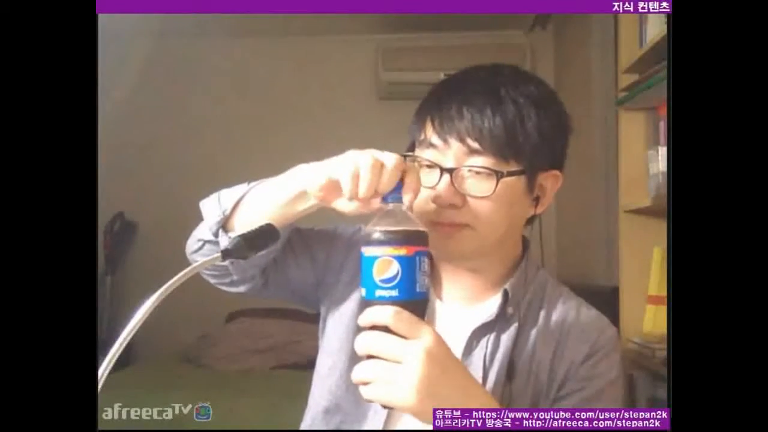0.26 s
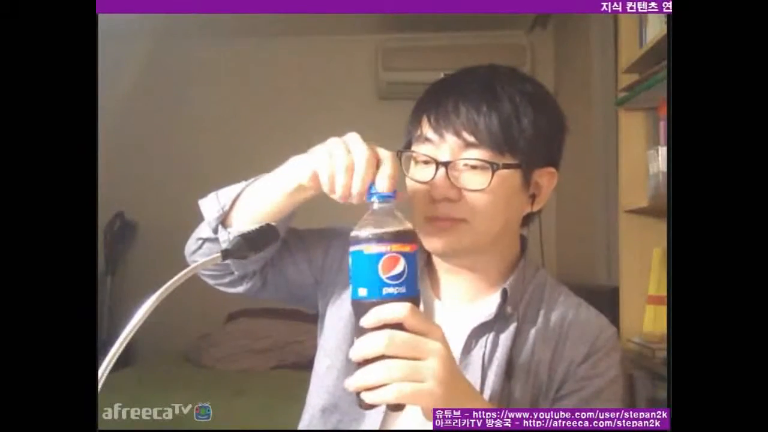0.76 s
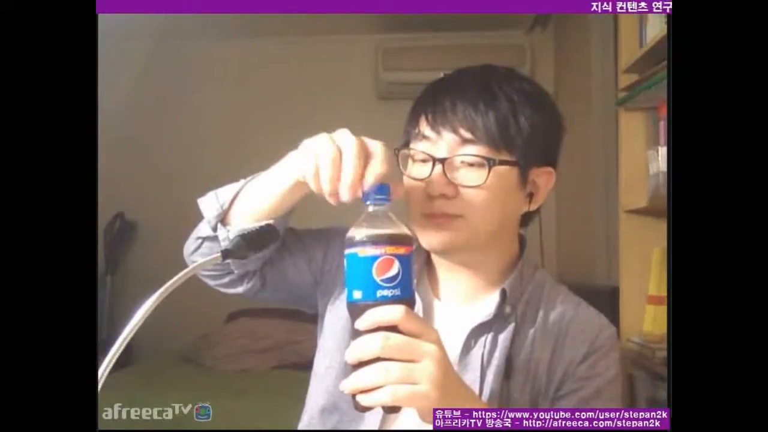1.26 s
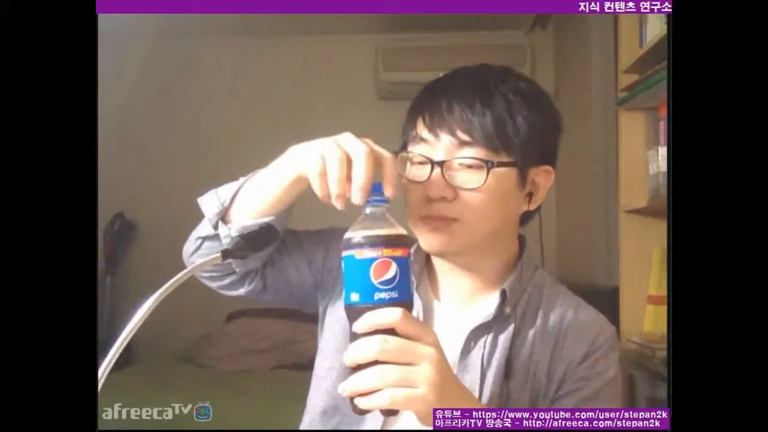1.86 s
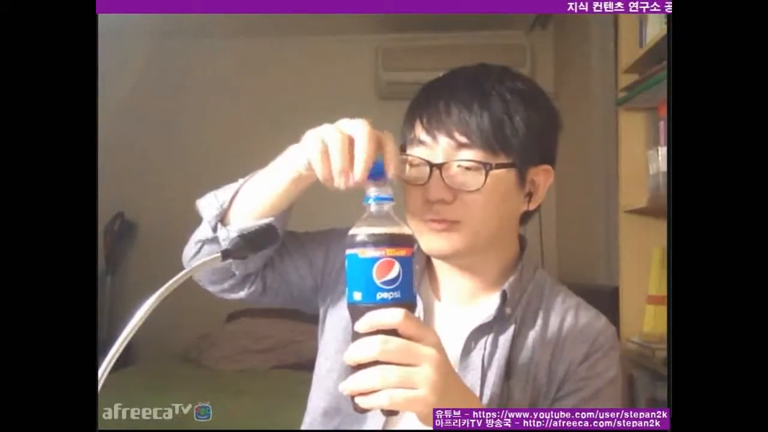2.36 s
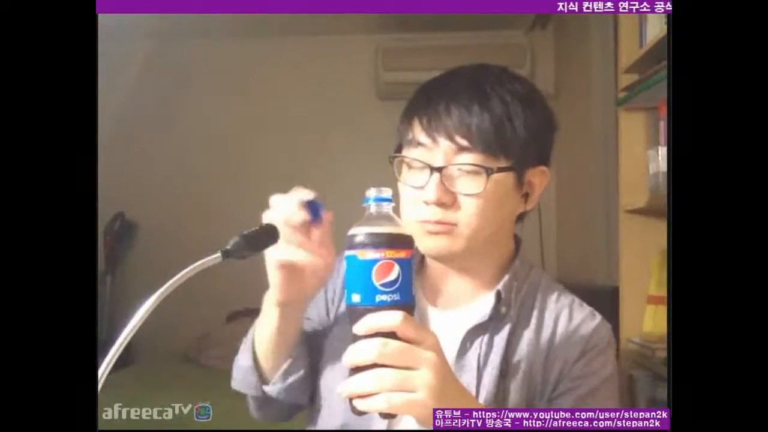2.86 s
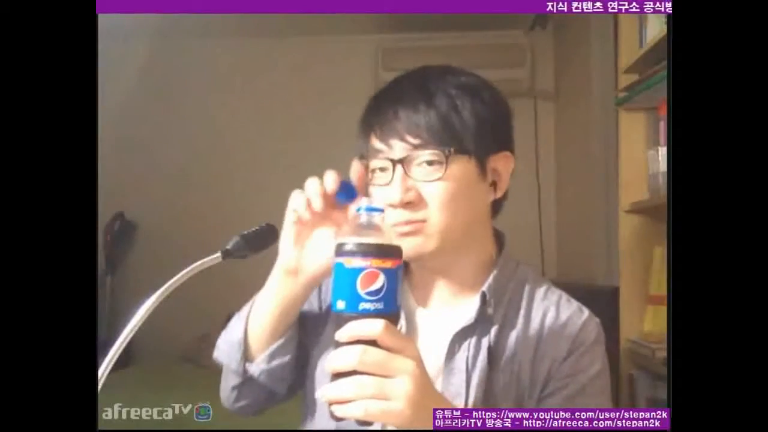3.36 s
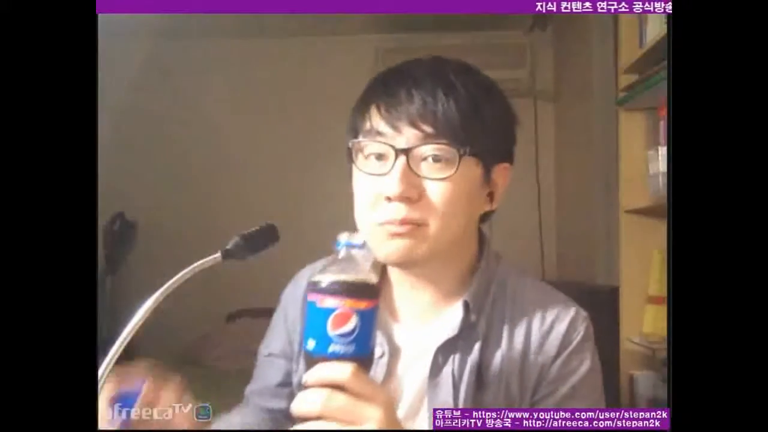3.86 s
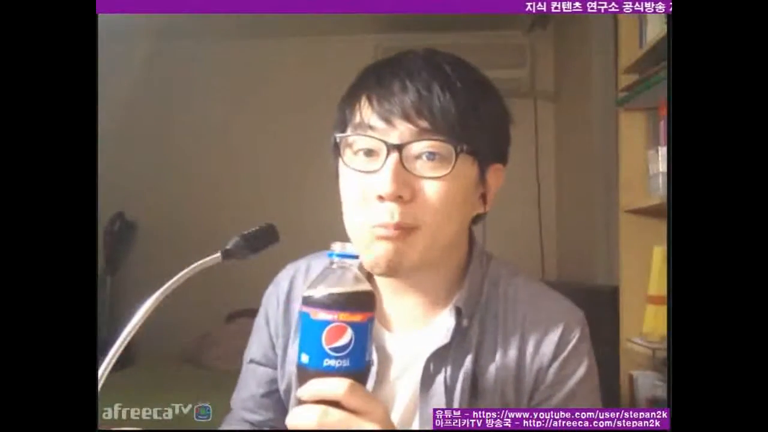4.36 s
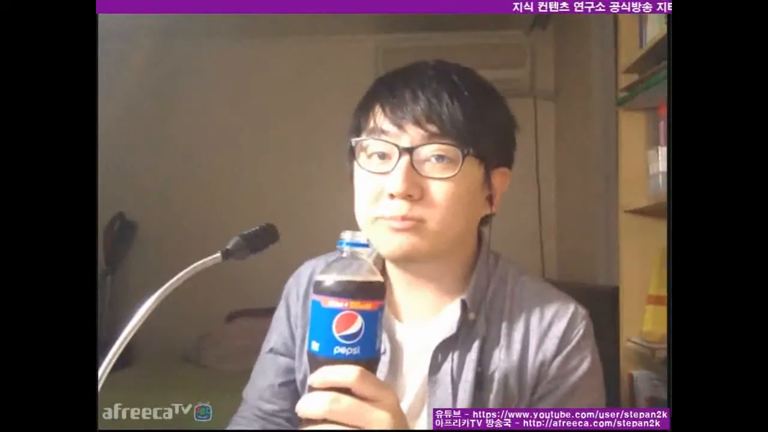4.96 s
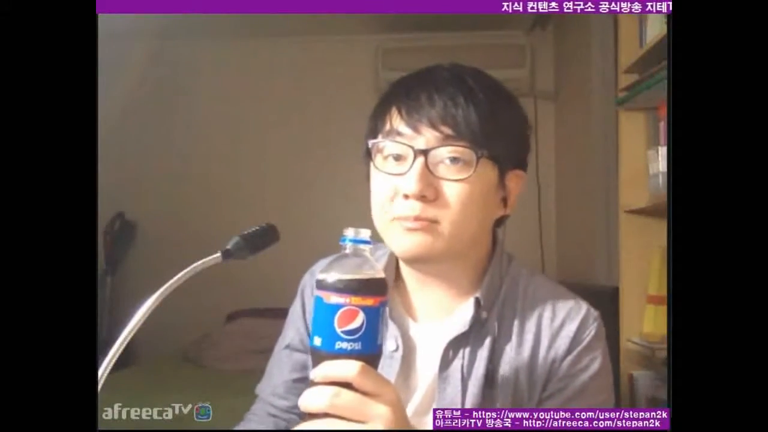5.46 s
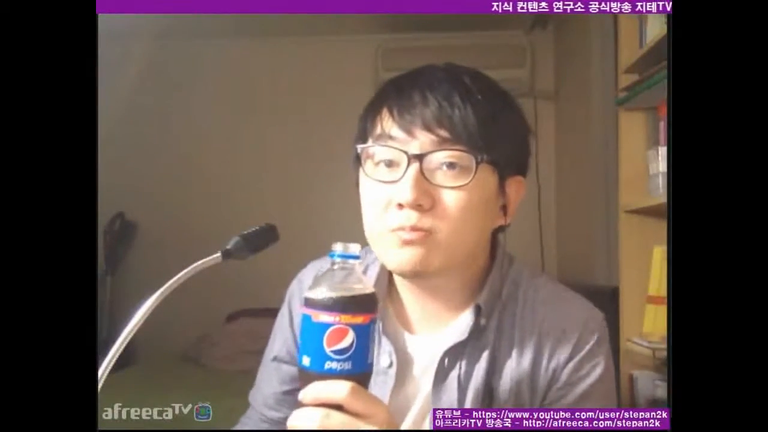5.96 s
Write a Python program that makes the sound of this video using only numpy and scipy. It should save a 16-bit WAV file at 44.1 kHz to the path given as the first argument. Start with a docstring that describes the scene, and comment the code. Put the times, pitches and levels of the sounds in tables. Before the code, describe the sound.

Close to a desk microphone in a small room, a soda bottle cap jerks on its seal with a loud sharp crack and a very brief gas hiss. The safety ring snaps, thread clicks run in quick clusters with faint rasping, and the cap pops free. A tiny rattle of the loose cap follows, then soft hollow bottle ticks and barely audible liquid laps over low hum and hiss.

```python
"""Small room, desk microphone: the screw cap of a plastic soda bottle is twisted open.
The cap jerks on its seal as gas spits, the safety ring tears, the thread clicks and rasps, the cap comes free.
The loose cap chatters, the bottle wall ticks and the drink laps softly, over mains hum and hiss.
Clicks are decaying sines plus filtered noise; gas, rasp and hiss are filtered noise; laps are rising sines.
An overload control and a steep low-pass near 7 kHz finish the sound."""
import sys
import numpy as np
from scipy import signal
from scipy.fft import rfft, irfft, next_fast_len
from scipy.io import wavfile
from scipy.ndimage import uniform_filter1d

SR = 44100
rng = np.random.default_rng(int(sys.argv[2]) if len(sys.argv) > 2 else 0)


def store_pcm(level_fs):
    """Save levels as 16-bit WAV."""
    pcm = np.round(np.clip(level_fs, -1, 1) * 32767).astype(np.int16)
    wavfile.write(sys.argv[1], SR, np.atleast_2d(pcm).T)


N = 274743
TIME_S = np.arange(N) / SR

# Source levels are ahead of room and gain control; crack levels are ahead of the shell and wall colour.
# mains lines: frequency [Hz], level_db [dB rms]
HUM_LINES = [(60, -64.5), (120, -88.5), (180, -92), (300, -83.5), (420, -92.5), (660, -92.5), (900, -96),
             (1020, -93.5)]
# microphone hiss colour: frequency [Hz], density_db [dB per Hz, relative]
HISS_COLOUR = [(30, -10), (100, 1.5), (200, 1), (450, 0), (1100, 0), (1800, -1.5), (3400, 1.5),
               (4500, -2.5), (6300, -7), (7300, -9.5)]
# room decay: frequency [Hz], t60_s [s]
ROOM_T60 = [(200, 0.3), (1000, 0.081), (3200, .33), (7000, 0.2)]
# cap and neck colour: frequency [Hz], gain_db [dB]
SHELL_COLOUR = [(60, -35.5), (150, -16.5), (330, -0.5), (900, -2), (1500, -1.5), (2100, 4), (2700, 5.5),
                (3900, 5), (5200, 1.5), (6600, -8.5), (7400, -18.5)]
# bottle wall modes: centre_hz [Hz], half_width_hz [Hz], lift_db [dB]
WALL_MODES = [(440, 110, 3.5), (860, 70, 4.5), (1205, 30, 6), (1530, 170, 6.5), (2450, 66, 4.5),
              (3370, 160, 5), (3950, 23, 6), (4700, 90, 4)]
# cap ring radiated all round the room: frequency [Hz], level_db [dB, relative]
RADIATED_COLOUR = [(300, -30.5), (1200, -18), (2300, -1), (3300, 4), (4700, -3.5), (5800, -11), (7400, -20)]
# anchors of the low, middle and high crack levels: frequency [Hz]
CRACK_ANCHORS_HZ = [626, 1340, 5200]
# cap jerks on its seal: start_s [s], ring_peak_db [dB], ring_hz [Hz],
# crack_high_db [dB re ring], tilt_db [dB per octave, fall towards the bass]
SEAL_JERKS = [(.0342, -25, 3380, 18, 30), (0.052, -37, 2860, 26.5, 16.5), (.0615, -40.5, 3160, 16.5, 11),
              (0.1226, -3.5, 3220, 12, 4.8), (0.1706, -21, 3530, 9.5, 10), (0.3028, -47, 3200, -0.5, 5.5),
              (0.3562, -32.5, 4400, 25.5, 14), (0.7519, -19.5, 3620, 13.5, 13)]
# gas spit and last leak: start_s [s], hold_s [s], level_db [dB rms]
GAS_LEAKS = [(.115, .022, -37), (.3, .025, -67.5)]
# gas jet colour: frequency [Hz], density_db [dB per Hz, relative]
JET_COLOUR = [(800, -39.5), (2200, -25.5), (2800, -7.5), (3250, 6), (3800, -4.5), (4400, -12.5),
              (6000, -22), (7500, -34.5)]
# ring tears, cap comes free: start_s [s], ring_peak_db [dB], ring_hz [Hz],
# crack_low_db, crack_mid_db, crack_high_db [dB re ring], rebound_delay_s [s], room_db [dB]
PLASTIC_BREAKS = [(1.0695, -13, 2503, -4.5, 8.5, 12, 0.001687, -13.5),
                  (2.4278, -25.5, 3070, 15.5, 20.1, 27.7, .0025, -13)]
# thread slips: start_s [s], nominal_db [dB], ring_hz [Hz], body_db [dB re usual]
THREAD_TICKS = [(1.1659, -36, 3320, 0), (1.3763, -49.5, 3340, 0), (1.5599, -34.5, 3900, 0.5),
                (1.5854, -34.5, 3650, 1.5), (1.6115, -36, 3470, 0.5), (1.6421, -39, 3450, -2.5),
                (1.6622, -41, 3500, -1), (1.6851, -38, 3300, -1), (1.7148, -35, 3460, -2.5),
                (1.9668, -47, 2880, 0), (1.99, -45.5, 3300, 0), (1.9975, -42.5, 3450, 0),
                (2.0148, -32.5, 3400, -2), (2.0261, -33, 3520, -4), (2.049, -45, 3400, -2),
                (2.1117, -40, 3100, -0.5), (2.2036, -47, 3400, -1), (2.2176, -45, 3620, -0.5),
                (2.2248, -48, 2850, 0.5), (2.4949, -39.5, 3320, 1)]
# cap thread and fingers rub: start_s [s], hold_s [s], level_db [dB], body_db [dB re usual]
RUB_STROKES = [(1.169, 0.168, -73, 4.5), (1.595, 0.11, -58.5, 2.5), (1.997, .11, -60, -7.5),
               (2.05, 0.0057, -50.5, -11), (2.444, 0.031, -52.5, 1), (2.782, 0.022, -55, -6.5),
               (3.06, 0.067, -74, 5), (4.788, 0.044, -64.5, 0.5), (4.88, 0.16, -76, 2.5)]
# rasp colour: frequency [Hz], density_db [dB per Hz, relative, ahead of the wall]
THREAD_COLOUR = [(150, -34.5), (400, -18), (900, -17), (1500, -7.5), (2400, 2), (3400, 8), (4300, -10.5),
                 (5200, -14.5), (7200, -40)]
# laps of the drink: start_s [s], bubble_peak_db [dB], bubble_hz [Hz]
DRINK_LAPS = [(1.598, -64.5, 866), (1.615, -74, 442), (1.69, -72, 735), (1.717, -69, 537),
              (3.056, -69, 504), (3.127, -67, 1195), (3.295, -62.5, 1183), (3.434, -73, 538),
              (3.724, -62, 1150), (3.938, -70.5, 423), (4.53, -66, 1160), (4.558, -58, 1087),
              (4.6, -67, 1107), (4.713, -70.5, 373), (4.755, -71.5, 570), (4.896, -70, 430),
              (5.03, -76, 527), (5.412, -67.5, 843)]
# fingers dent the wall: start_s [s], ring_peak_db [dB], ring_hz [Hz], body_db [dB re ring]
WALL_KNOCKS = [(3.061, -46.5, 2930, 18), (3.092, -57.5, 2050, 13), (3.533, -47.5, 3550, 32.5),
               (4.5594, -50.5, 2585, 29.5), (4.5959, -59.5, 2570, 32), (4.795, -51.5, 2450, 22.5),
               (4.8155, -48, 3100, 18), (4.8312, -50, 3100, 17), (4.892, -56.5, 3440, 20.5),
               (5.001, -54.5, 2495, 13), (5.469, -63.5, 2430, 28)]

GAS_RISE_DB_PER_S, GAS_FALL_DB_PER_S = 2600, 330
REBOUND_DB, REBOUND_HZ = -4, 3560  # level re the break
TICK_RING_DB, TICK_CRACK_DB = -5, [0.5, 18.5, 9.5]  # ring re nominal; low, middle, high crack re ring
TICK_USUAL_DB, TICK_PURITY_DB_PER_DB = -39, 0.5
STROKE_RISE_DB_PER_S, STROKE_FALL_DB_PER_S = 1101, 554
BODY_FADES_HZ = 1500, 2780  # hollow body: full below the first, none above the second
BACKWASH_S, BACKWASH_DB, BACKWASH_PITCH_RATIO = 0.03, -10.5, 0.872  # re the lap
CHATTER_S, CHATTER_GAP_S, CHATTER_DB, CHATTER_GROWS_DB = 2.7805, 0.0056, -38, 3  # growth per slip
CHATTER_HZ, CHATTER_CRACK_DB = 3160, [-21, 18.5, 0]  # low, middle, high crack re ring
KNOCK_LOW_DB, KNOCK_HIGH_DB = -6.5, 4.5  # bass re body, treble re ring
TOP_HZ = 7100


def amp(db):
    """Decibels to gain."""
    return 10 ** (np.asarray(db) / 20)


def unit(x):
    """Scale to rms 1."""
    return x / np.sqrt(np.mean(x ** 2) + 1e-20)


def along(points, hz):
    """Interpolate (Hz, value) points on a log frequency axis."""
    point_hz, values = np.transpose(points)
    return np.interp(np.log(hz + 1), np.log(point_hz), values)


def filtered(x, response):
    """Zero-phase filter; response maps Hz to gain."""
    size = next_fast_len(N + SR // 2)
    gain = response(np.fft.rfftfreq(size, 1 / SR))
    return irfft(rfft(x, size) * gain, size)[:N]


def coloured(x, spectrum):
    """Filter to a spectrum table, at rms 1."""
    return unit(filtered(x, lambda hz: amp(along(spectrum, hz))))


def causal(gain):
    """Minimum-phase impulse response with this gain per frequency, by folding the cepstrum."""
    cepstrum = irfft(np.log(gain + 1e-6))
    half = len(cepstrum) // 2
    cepstrum[1:half] *= 2
    cepstrum[half + 1:] = 0
    return irfft(np.exp(rfft(cepstrum)))


def add(track, start_s, sound):
    """Mix a sound into the track in place."""
    place = track[max(round(start_s * SR), 0):][:len(sound)]
    place += sound[:len(place)]


def burst(t_s, swell_s):
    """Envelope that peaks at 1 after swell_s, then dies away."""
    return t_s / swell_s * np.exp(1 - t_s / swell_s)


def envelope(start_s, hold_s, level_db, rise_db_per_s, fall_db_per_s):
    """Gain per sample that rises to level_db at start_s, holds and dies away."""
    rise_db = rise_db_per_s * np.maximum(start_s - TIME_S, 0)
    fall_db = fall_db_per_s * np.maximum(TIME_S - start_s - hold_s, 0)
    return amp(level_db - rise_db - fall_db)


def echoes(gap_s=0.0019, near_db=5, near_extra_t60_s=0.11):
    """Fresh room answer of energy 1: strong desk and wall echoes, then a short tail."""
    hz, t_s, bins = signal.stft(rng.standard_normal(SR // 3), SR, nperseg=256)
    decay = amp(-60 * t_s / along(ROOM_T60, hz)[:, None])
    tail = signal.istft(bins * decay, SR, nperseg=256)[1]
    t_s = np.arange(len(tail)) / SR
    near = amp(near_db) * np.exp(-np.log(1000) * t_s / near_extra_t60_s)
    tail *= (1 + near) * (t_s > gap_s)
    return tail / np.linalg.norm(tail)


def room(x, wet_db):
    """Direct sound plus the room's answer at wet_db."""
    answer = amp(wet_db) * echoes()
    answer[0] = 1
    return signal.fftconvolve(x, answer)


def wall_db(hz):
    """The bottle's modes lift narrow bands of whatever excites it."""
    return sum(lift_db / (1 + ((hz - centre_hz) / half_width_hz) ** 2)
               for centre_hz, half_width_hz, lift_db in WALL_MODES)


def snap(ring_hz, crack_db, spread_s, swell_s=0.00057, fracture_db=-3, crisp_spread_s=0.0032,
         crack_gain_db=-1, ring_to_room_db=-5, size=2048):
    """One break as (direct, into the room): the cap rings while the crack scatters through the wall."""
    t_s, hz = np.arange(size) / SR, np.fft.rfftfreq(size, 1 / SR)
    ring = burst(t_s, swell_s) * np.sin(2 * np.pi * ring_hz * t_s)

    scatter = rng.standard_normal(size) * burst(t_s, spread_s)
    scatter /= np.linalg.norm(scatter)
    sharpness = min(1, crisp_spread_s / spread_s) ** 2  # slow give has a weaker edge
    scatter[round(swell_s * SR / 2)] += amp(fracture_db) * sharpness

    crack_points = list(zip(CRACK_ANCHORS_HZ, crack_db))
    colour_db = crack_gain_db + along(SHELL_COLOUR, hz) + wall_db(hz) + along(crack_points, hz)
    colour = causal(amp(colour_db))
    crack = signal.fftconvolve(scatter, colour)[:size]
    crack *= np.linalg.norm(colour) / np.linalg.norm(crack)

    # summed over directions, the ring blurs into a broad band
    all_round = causal(amp(along(RADIATED_COLOUR, hz)))
    all_round *= amp(ring_to_room_db) * np.linalg.norm(ring) / np.linalg.norm(all_round)
    return ring + crack, colour + all_round


def click(peak_db, ring_hz, crack_db, spread_s, wet_db):
    """One snap of the plastic with its own echo."""
    direct, radiated = snap(ring_hz, crack_db, spread_s)
    sound = amp(wet_db) * signal.fftconvolve(radiated, echoes())
    add(sound, 0, direct)
    return amp(peak_db) * sound


def background(hiss_db=-76):
    """Mains hum as steady sines, microphone hiss as coloured noise."""
    hum = np.zeros(N)
    for hz, level_db in HUM_LINES:
        hum += amp(level_db) * np.sqrt(2) * np.sin(2 * np.pi * (hz * TIME_S + rng.random()))
    return hum + amp(hiss_db) * coloured(rng.standard_normal(N), HISS_COLOUR)


def seal(usual_spread_s=0.00081, usual_wet_db=-13, usual_db=-25, sharper_per_db=0.045, drier_db_per_db=0.12):
    """The cap jerks on its seal; the harder the jerk, the shorter and drier its crack."""
    out = np.zeros(N)
    octaves_down = np.log2(CRACK_ANCHORS_HZ[-1] / np.array(CRACK_ANCHORS_HZ))
    for start_s, peak_db, ring_hz, crack_high_db, tilt_db in SEAL_JERKS:
        force_db = peak_db - usual_db
        crack_db = crack_high_db - tilt_db * octaves_down
        spread_s = usual_spread_s * np.exp(-sharper_per_db * force_db)
        wet_db = usual_wet_db - drier_db_per_db * force_db
        add(out, start_s, click(peak_db, ring_hz, crack_db, spread_s, wet_db))
    return out


def gas():
    """Pressure escapes through the narrow gap between cap and neck as a band of noise."""
    flow = sum(envelope(start_s, hold_s, level_db, GAS_RISE_DB_PER_S, GAS_FALL_DB_PER_S)
               for start_s, hold_s, level_db in GAS_LEAKS)
    jet = flow * coloured(rng.standard_normal(N), JET_COLOUR)
    return room(jet, wet_db=-12)[:N]


def breaks(spread_s=0.00039, rebound_spread_s=0.0009):
    """The safety ring tears and later the cap comes free: a broad crack, then a quick rebound."""
    out = np.zeros(N)
    for start_s, peak_db, ring_hz, *crack_db, delay_s, wet_db in PLASTIC_BREAKS:
        add(out, start_s, click(peak_db, ring_hz, crack_db, spread_s, wet_db))
        rebound = click(peak_db + REBOUND_DB, REBOUND_HZ, crack_db, rebound_spread_s, wet_db)
        add(out, start_s + delay_s, rebound)
    return out


def ticks(spread_s=0.0023, wet_db=-9):
    """The thread catches and slips, ringing the cap; harder slips ring purer, weak ones mostly crackle."""
    out = np.zeros(N)
    for start_s, nominal_db, ring_hz, body_db in THREAD_TICKS:
        pure_db = TICK_PURITY_DB_PER_DB * (nominal_db - TICK_USUAL_DB)
        ring_db = nominal_db + TICK_RING_DB + pure_db
        crack_db = np.add(TICK_CRACK_DB, [body_db, body_db, 0]) - pure_db
        add(out, start_s, click(ring_db, ring_hz, crack_db, spread_s, wet_db))
    return out


def thread(slips_per_s=500, spread_db=4):
    """Rubbing plastic sticks and slips in tiny uneven steps that sound through the bottle wall."""
    slips = (rng.random(N) < slips_per_s / SR) * rng.choice([-1, 1], N)
    slips = slips * amp(spread_db * rng.standard_normal(N))
    rasp = unit(filtered(slips, lambda hz: amp(along(THREAD_COLOUR, hz) + wall_db(hz))))
    body = filtered(rasp, lambda hz: np.interp(hz, BODY_FADES_HZ, [1, 0]))
    rubbing = np.zeros(N)
    for start_s, hold_s, level_db, body_db in RUB_STROKES:
        stroke = envelope(start_s, hold_s, level_db, STROKE_RISE_DB_PER_S, STROKE_FALL_DB_PER_S)
        rubbing += stroke * (rasp - body + amp(body_db) * body)
    return room(rubbing, wet_db=-5.5)[:N]


def drink(swell_s=0.0027, rise_per_s=1.8, splash_db=-3, splash_half_width_hz=220):
    """Each lap and its backwash trap a bubble whose pitch creeps up, with a soft splash around it."""
    out, t_s = np.zeros(N), np.arange(SR // 10) / SR
    bins_hz = np.fft.rfftfreq(len(t_s), 1 / SR)
    backwash = [(start_s + BACKWASH_S, peak_db + BACKWASH_DB, hz * BACKWASH_PITCH_RATIO)
                for start_s, peak_db, hz in DRINK_LAPS]
    for start_s, peak_db, hz in DRINK_LAPS + backwash:
        bubble = np.sin(2 * np.pi * hz * t_s * (1 + rise_per_s * t_s / 2))
        band = 1 / (1 + ((bins_hz - hz) / splash_half_width_hz) ** 2)
        splash = unit(irfft(rfft(rng.standard_normal(len(t_s))) * band, len(t_s)))
        lap = amp(peak_db) * burst(t_s, swell_s) * (bubble + amp(splash_db) * splash)
        add(out, start_s, room(lap, wet_db=4))
    return out


def chatter(count=4, spread_s=0.0013, wet_db=-9):
    """The loose cap slips in the fingers: a fast, even, growing run of clicks."""
    out = np.zeros(N)
    for k in range(count):
        peak_db = CHATTER_DB + k * CHATTER_GROWS_DB
        slip = click(peak_db, CHATTER_HZ, CHATTER_CRACK_DB, spread_s, wet_db)
        add(out, CHATTER_S + k * CHATTER_GAP_S, slip)
    return out


def knocks(spread_s=0.0063, wet_db=-6.0):
    """The bottle wall gives slowly under the fingers: soft, hollow ticks."""
    out = np.zeros(N)
    for start_s, peak_db, ring_hz, body_db in WALL_KNOCKS:
        crack_db = [body_db + KNOCK_LOW_DB, body_db, KNOCK_HIGH_DB]
        add(out, start_s, click(peak_db, ring_hz, crack_db, spread_s, wet_db))
    return out


def scene():
    """Bottle, drink and background at one microphone."""
    plastic = seal() + breaks() + ticks() + chatter() + knocks()
    return (background() + plastic + gas() + thread() + drink())[None]


def gain_control(x, depth_db=7.5, recovery_s=0.7, threshold_db=-17, slope_db_per_db=5, attack_s=0.003):
    """An overload turns the gain down within milliseconds; it creeps back over a second or two."""
    loud_db = 10 * np.log10(np.abs(uniform_filter1d(x ** 2, size=88)) + 1e-12)
    needed_db = np.clip(slope_db_per_db * (loud_db - threshold_db), 0, depth_db)
    # peak hold with exponential release
    growth = np.exp(TIME_S / recovery_s)
    held_db = np.maximum.accumulate(needed_db * growth) / growth
    pole = np.exp(-1 / (attack_s * SR))
    cut_db = signal.lfilter([1 - pole], [1, -pole], held_db)
    return x * amp(-cut_db)


def record(dry):
    """Gain control, then a steep low-pass near 7 kHz."""
    return filtered(gain_control(dry[0]), lambda hz: 1 / np.sqrt(1 + (hz / TOP_HZ) ** 90))[None]


dry = scene()
out = record(dry)
store_pcm(out)
```